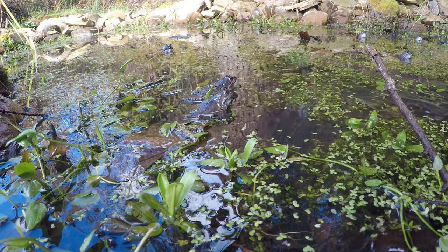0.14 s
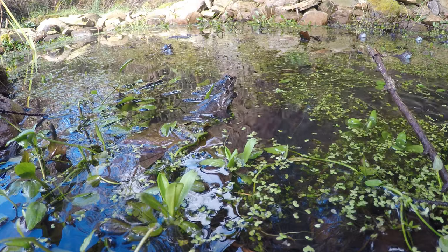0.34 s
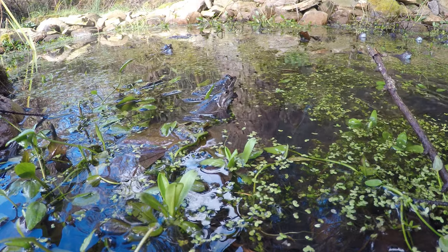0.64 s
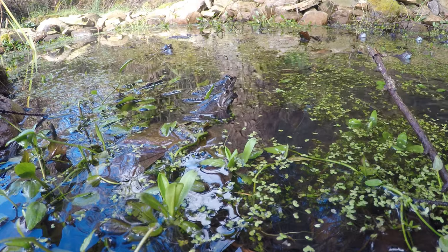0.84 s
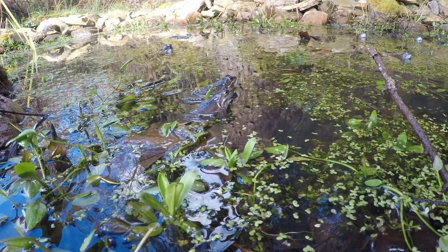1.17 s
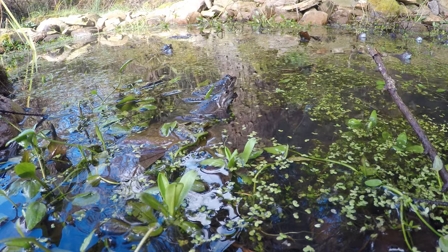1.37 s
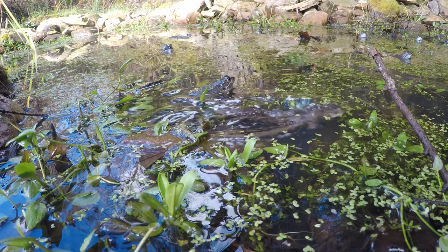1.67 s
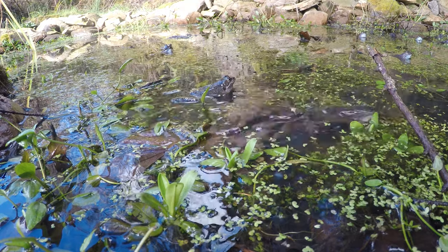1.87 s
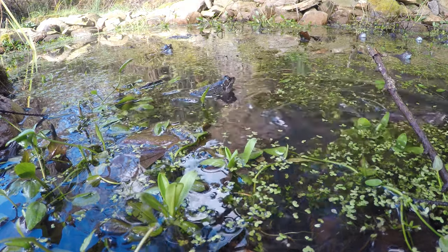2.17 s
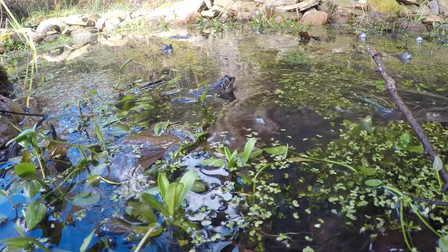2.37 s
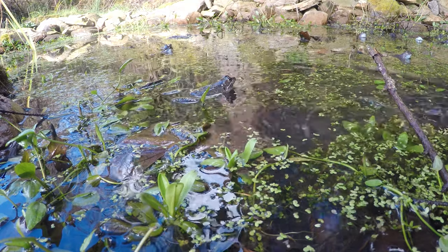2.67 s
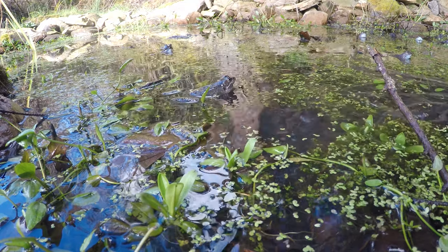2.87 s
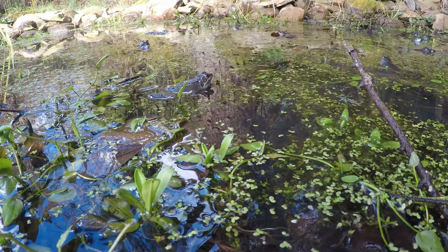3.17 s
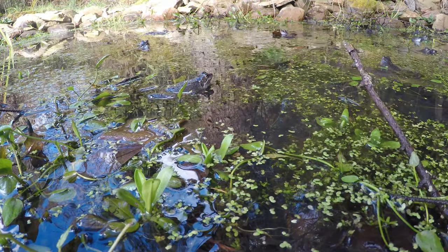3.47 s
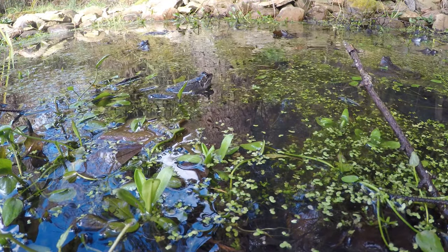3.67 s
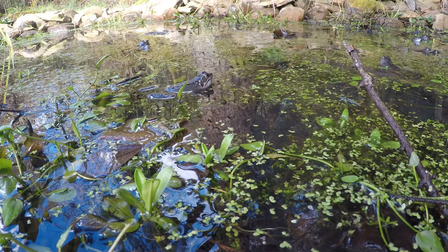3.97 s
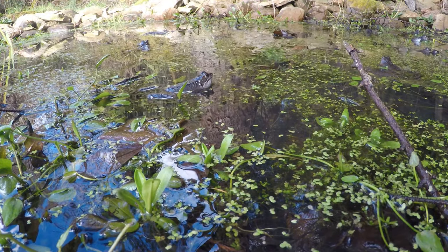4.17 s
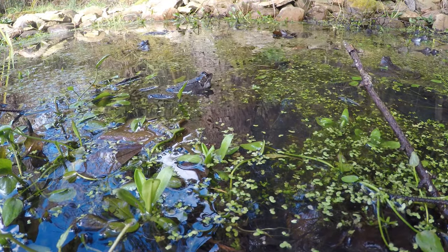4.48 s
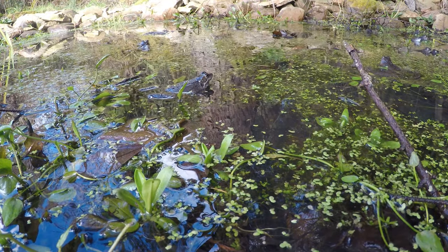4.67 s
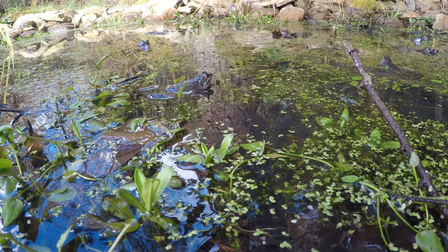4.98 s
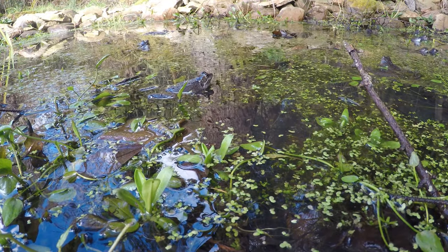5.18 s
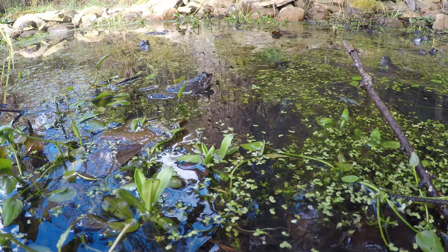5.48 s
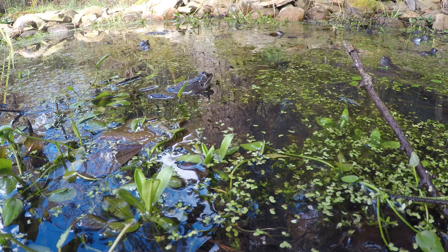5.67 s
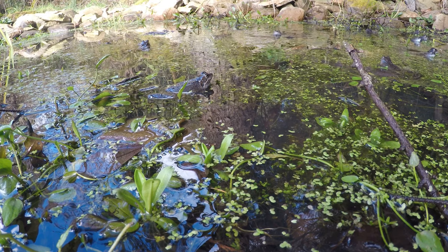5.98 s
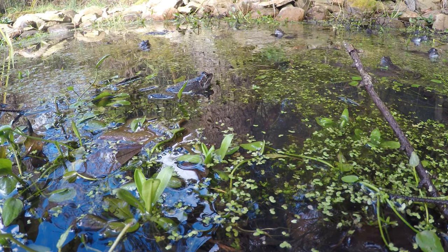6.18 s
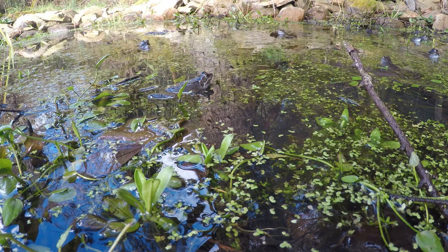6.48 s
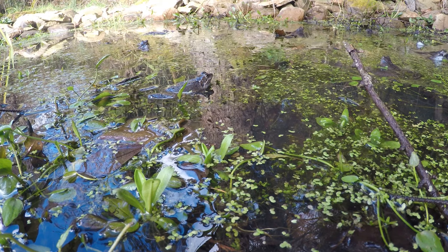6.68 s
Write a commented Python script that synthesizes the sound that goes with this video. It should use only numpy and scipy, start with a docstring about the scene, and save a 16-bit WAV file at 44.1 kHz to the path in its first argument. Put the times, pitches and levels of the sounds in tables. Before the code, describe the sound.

Overlapping soft frog croaks, a faint watery gurgle, then sparse croaking and bright bird chirps over a very quiet outdoor hush.

```python
"""Under a soft outdoor hush (shaped noise) frogs purr in a garden pond from the start.
Each croak is a swelling train of knocks, impulses that excite resonances of the throat and its air sacs.
A small bird sings thin notes, near sines of gliding pitch; others answer from farther off, mostly as echo.
Now and then the water plips, a noise splash and a ringing bubble, and once it gurgles with low bubbles.
The garden adds a short echo, noise taps that decay at a different rate in each band."""
import sys
import numpy as np
from scipy import signal
from scipy.fft import rfft, irfft
from scipy.io import wavfile
from scipy.ndimage import uniform_filter1d

SR = 44100
rng = np.random.default_rng(int(sys.argv[2]) if len(sys.argv) > 2 else 0)


def store_wav(level_fs):
    """Save 16-bit WAV to argv[1]."""
    pcm = np.round(np.clip(np.atleast_2d(level_fs), -1, 1) * 32767)
    wavfile.write(sys.argv[1], SR, pcm.T.astype(np.int16))


N = 301203  # samples


def gain_of(db):
    """Logarithmic level: decibels to an amplitude factor."""
    return 10 ** (np.asarray(db) / 20)


def evened(x):
    """Power normalization: scales to rms 1."""
    return x / np.sqrt(np.mean(x ** 2) + 1e-20)


def read(points, hz, column=1):
    """Interpolation on a logarithmic frequency axis: one column of a table whose first column is Hz."""
    points = np.array(points)
    return np.interp(np.log(hz + 1), np.log(points[:, 0]), points[:, column])


def add(mix, s, sound):
    """Superposition: mixes a sound in at time s, trimmed to the scene."""
    at = round(s * SR)
    sound = sound[max(-at, 0):]
    part = mix[max(at, 0):][:len(sound)]
    part += sound[:len(part)]


def place(x, right_db):
    """Interaural level difference: a source to the right reaches the left microphone weaker."""
    return x * gain_of([[-right_db / 2], [right_db / 2]])


# Spectrum of the outdoor hush. Each row: frequency in Hz, relative density in dB per Hz.
HUSH_SPECTRUM = [(28, -13), (48, -15.5), (126, -38), (152, 6), (220, 4.5), (330, 1), (600, -6.5),
                 (1500, -12.5), (3500, -17), (5000, -18.5), (10000, -19), (12000, -27), (15000, -29)]


def hush(level_db=-55, patchy_db=1.5):
    """Diffuse field: air and leaves as noise, unrelated at the two microphones, drifting in soft patches."""
    frames = N // 512 + 5
    hz = np.fft.rfftfreq(2048, 1 / SR)
    a, b, c, d, patches = rng.standard_normal((frames, len(hz), 5)).T
    # smoothed first over frequency, then over time
    patches = uniform_filter1d(patches, size=20, axis=0)
    patches = evened(uniform_filter1d(patches, size=10, axis=1))
    spectrum_db = read(HUSH_SPECTRUM, hz)[:, None] + patchy_db * patches
    z = np.array([a + 1j * b, c + 1j * d]) * gain_of(spectrum_db)
    noise = signal.istft(z, nperseg=2048, noverlap=1536)[1][:, :N]
    return gain_of(level_db) * evened(noise)


def peak(hz, centre_hz, half_width_hz):
    """Resonance curve: gain falls with the squared distance from the centre, so the skirts are steep."""
    return 1 / (1 + ((hz - centre_hz) / half_width_hz) ** 2)


def through(values, u):
    """Polynomial interpolation: a smooth curve through evenly spaced values, for u from 0 to 1."""
    places = np.linspace(0, 1, len(values))
    return np.polyval(np.polyfit(places, values, len(values) - 1), u)


def ringing(gain, swell):
    """Minimum phase, from the cepstrum, makes a ring start abruptly; weakening it by swell adds a build-up."""
    cepstrum = irfft(np.log(gain + 1e-6))
    half = len(cepstrum) // 2
    fold = np.r_[1, np.full(half - 1, 2), 1, np.zeros(half - 1)]
    minimum_phase = rfft(cepstrum * fold).imag
    ring = irfft(gain * np.exp(1j * (1 - swell) * minimum_phase))
    return np.roll(ring, half)  # time zero lies in the middle of the array


SWELL = 0.31  # share of a knock that builds up, at the usual ring time
RASP_WIDTH_HZ = 129  # half width of the upper modes
THROAT_TOP_HZ = 792  # before tuning; above it sacs and throat fall silent: a hollow under the upper modes

# Resonances of the throat.
# Each row: frequency in Hz before tuning, half width in Hz, level in dB before the croak's throat level.
THROAT_MODES = [(595, 32, -41), (690, 42, -41)]


def knock(sac_hz, ring, throat_db, throat_shift, upper, sac_width=260, bass_reach=2.3, usual_ring=0.031):
    """Modal excitation: a knock rings the air sacs, the throat and any upper modes; short ones swell as they die."""
    hz = np.fft.rfftfreq(8192, 1 / SR) + 1

    # a small soft body radiates neither deep bass nor treble; a short ring reaches farther down
    bass_limit_hz = sac_hz - bass_reach / ring
    body = 1 / np.sqrt((1 + (bass_limit_hz / hz) ** 10) * (1 + (hz / 1950) ** 30))

    # the longer the sac rings, the narrower and taller its resonance
    ring_width_hz = np.log(1000) / (2 * np.pi * ring)
    sac = ring * np.sqrt(peak(hz, sac_hz, ring_width_hz)) * peak(hz, sac_hz, sac_width)

    throat = sum(gain_of(throat_db + db) * peak(hz, f * throat_shift, width)
                 for f, width, db in THROAT_MODES)
    hollow = 1 / (1 + (hz / (THROAT_TOP_HZ * throat_shift)) ** 20)
    rasp = ring * sum(gain_of(db) * np.exp(-.5 * ((hz - f) / RASP_WIDTH_HZ) ** 2) for f, db in upper)

    spectrum = body * np.sqrt(hollow * (sac ** 2 + throat ** 2) + rasp ** 2)
    return SR * ringing(spectrum, min(SWELL * usual_ring / ring, 1))


KNOCK_OFFSET_S = 0.001135  # constant time offset of every knock against its listed start
RISE_CURVE, FALL_CURVE = 1.7, 3.2  # effort rounds off toward its top (exponents)
SAC_CURVE, THROAT_CURVE = 2.2, 2.1  # sacs retune and throat opens mostly late in a croak (exponents)
RING_PER_PITCH = 1.5  # a tighter, higher sac rings shorter (exponent)
RASP_PER_EFFORT = 0.52  # harder knocks rasp more (dB per dB)


def croak(start, count, gaps_ms, effort, sac, ring, throat, upper, lag_ms, scatter=0.033, uneven_db=0.86):
    """Pulse train: one squeeze of air sets knocks that change pace, swell and fade as sacs and throat retune."""
    count = round(count)
    top_db, top_at, rise_db, fall_db = effort
    throat_db, growth_db, tuning = throat
    u = np.linspace(0, 1, count)
    top_at = np.clip(top_at, .05, .95)

    gaps = through(gaps_ms, np.linspace(0, 1, count - 1))
    times = start + np.r_[0, np.cumsum(gaps)] / 1000

    before_top = np.maximum(1 - u / top_at, 0)
    after_top = np.maximum((u - top_at) / (1 - top_at), 0)
    push_db = top_db - rise_db * before_top ** RISE_CURVE - fall_db * after_top ** FALL_CURVE
    forced_db = RASP_PER_EFFORT * (push_db - push_db.mean())

    sac_hz = sac[0] + (sac[1] - sac[0]) * u ** SAC_CURVE
    rings = ring * (sac_hz.mean() / sac_hz) ** RING_PER_PITCH
    throats = throat_db - growth_db * (1 - u ** THROAT_CURVE)

    out, lag = np.zeros((2, N)), lag_ms / 1000
    for k, (throat_luck, mode_luck, level_luck) in enumerate(rng.standard_normal((count, 3))):
        modes = [(hz * (1 + scatter * mode_luck), first + (last - first) * u[k] + forced_db[k])
                 for hz, first, last in upper]
        sound = knock(sac_hz[k], rings[k], throats[k], tuning * (1 + scatter * throat_luck), modes)
        sound = gain_of(push_db[k] + uneven_db * level_luck) * sound
        s = times[k] + KNOCK_OFFSET_S - len(sound) / 2 / SR
        for ear, delay in zip(out, (lag / 2, -lag / 2)):
            add(ear, s + delay, sound)
    return out


def widened(x, amount=1.6, above_hz=830):
    """Stereo widening: above the cut-off the chorus gets a quadrature side signal; the low body stays in place."""
    hz = np.fft.rfftfreq(N, 1 / SR) + 1
    upper = 1 / (1 + (above_hz / hz) ** 10)
    side = irfft(rfft(x.mean(0)) * 1j * amount * upper, N)
    return x + np.array([-side, side])


# Croaks, each a run of knocks of a frog's larynx. Each row: start in seconds, number of knocks,
# gaps between knocks in ms (at even steps through the croak),
# effort (top in dB before the chorus level, place of the top as a share of the croak before clipping,
# rise in dB, fall in dB), air sac pitch in Hz (first, last), sac ring time in seconds to -60 dB at mean pitch,
# throat (level at the end in dB, growth in dB, tuning ratio),
# upper modes heard in forced croaks [(Hz, first dB, last dB against the sac), before scatter and effort],
# delay of the left microphone after the right in ms.
CROAK_RUNS = [ (0.006, 12, (46.4, 48.7, 44.6), (-14, 0.52, 5, 1.2), (440, 455), 0.04, (4, 4, .96),
              [(1140, -27, -26), (1750, -38, -22)], 0.22), (0.035, 15, (50, 38.5, 36, 36.5, 39),
              (-22, .7, 5, 3), (510, 480), 0.024, (-5, 0, 1), [], 0.22), (1.096, 4, (67.3, 65, 59),
              (-20.5, 0.5, 11.5, .5), (470, 410), 0.026, (6.8, 17, .98), [], 0.1),
              (1.4312, 5, (36.5, 35, 38.8), (0.6, 0.65, 14.5, .3), (480, 540), .015, (-6, 8, 1),
              [(1060, -25, -21), (1690, -25, -25)], -0.12), (1.617, 3, (36.4, 36, 34.3),
              (-7.5, .1, -1, 4.5), (520, 484), 0.018, (0, 15, 1.02), [(1040, -17, -21), (1640, -31, -40)],
              -0.02), (1.721, 7, (33, 28, 24.3), (-8.5, 4, 5, -1), (438, 430), 0.046, (-1, 4, .98),
              [(930, -38, -30), (1300, -54, -36)], 0.05), (1.9142, 5, (25.3, 28, 34.5, 32.3),
              (-7, .05, 0, 7), (470, 505), .016, (-8, -3, 1), [(950, -21, -31), (1400, -27, -47)], 0.08),
              (2.077, 7, (37, 37.9, 34), (-16, -0.6, 3.5, 1), (467, 462), 0.022, (-18, 2, 1), [], 0.16),
              (2.3112, 10, (58, 44, 37), (-24, .5, 5, 0), (424, 450), 0.032, (-3, 16, 1), [], 0.16),
              (2.3407, 5, (39.5, 37.7, 37.2), (-16.5, 8, 2, 1), (520, 527), .023, (-23, 4, .92), [], 0.18),
              (2.585, 3, (38, 40, 39), (-20, -4, 3, 5), (522, 500), 0.028, (-14, 2, .88), [(950, -21, -19)],
              0.18), (2.7625, 5, (48, 44, 40), (-20.5, -2, 3, 8), (458, 440), 0.027, (1, 4, 1.12),
              [(900, -24, -10)], 0.1), (3.0023, 12, (43, 45.4, 38.5), (-22, .9, 4, 0), (400, 400),
              0.024, (-5, 3, .86), [], 0.03), (3.886, 10, (66.2, 52.4, 39), (-8.3, 3, 8, 4), (380, 406),
              0.03, (5, 28, 1.08), [(1270, -42, -39), (1620, -44, -46)], 0.0),
              (5.7496, 10, (52.2, 51, 29.6), (-15, .88, 17, 4), (380, 404), 0.038, (-8, 11, 1.05), [],
              -0.03)]


def frogs(level_db=-31.0, echo_db=-6, echo_per_db=0.21, right_db=2.2, right_db_per_ms=4):
    """Direct-to-reverberant ratio: the nearer and louder the frog, the drier; returns direct and echo feed."""
    direct, scattered = np.zeros((2, N)), np.zeros(N)
    for row in CROAK_RUNS:
        top_db, lag_ms = row[3][0], row[-1]
        sound = gain_of(level_db) * croak(*row)
        direct += place(sound, right_db + right_db_per_ms * lag_ms)
        scattered += gain_of(echo_db - echo_per_db * top_db) * sound.mean(0)
    return widened(direct), scattered


def whistle(length, pitch_hz, contour, waver=0.0085, flutter_db=0.85, overtone_db=-42, glide_loss_db=26):
    """Frequency modulation: a near sine glides along a contour, weaker where it lies below the note's pitch."""
    u = np.linspace(0, 1, max(int(length * SR), 64))
    ratio = np.interp(u, np.linspace(0, 1, len(contour)), contour)
    ratio = uniform_filter1d(ratio, size=len(u) // len(contour), mode="nearest")
    shake, flutter = (evened(uniform_filter1d(row, size=70))[:len(u)]
                      for row in rng.standard_normal((2, SR)))

    phase = 2 * np.pi * np.cumsum(pitch_hz * ratio * (1 + waver * shake)) / SR
    tone = np.sin(phase) + gain_of(overtone_db) * np.sin(2 * phase)
    level = gain_of(flutter_db * flutter - glide_loss_db * np.maximum(1 - ratio, 0))
    envelope = np.maximum(1 - (2 * u - 1) ** 2, 0) ** 0.49
    return tone * level * envelope


# Pitch contours, by kind of bird note. Each entry: ratios to the note's pitch at even steps through the note.
PITCH_CONTOURS = {"slur": (.66, .71, 0.99, 1.02, 1.01, .99, 0.8),
                  "dip": (1.24, 1.09, 1.025, 1, 1, 1.01, 1.08, 1.22),
                  "step": (.8, .94, .99, 1, 1.005, 1.01), "hold": (.97, 1.005, 1, .99),
                  "rise": (.8, 1.01, 1.17), "fall": (1.17, .99, .86), "sag": (1.2, 0.98, 0.98)}


def far_birds(level_db=-69, low_hz=2900, high_hz=3800, length=0.081, count=26, until_s=4.3):
    """Reverberant field: faint twitter of distant birds at random times, heard only as echo."""
    out = np.zeros(N)
    for when, pitch in rng.random((count, 2)):
        note = whistle(length, low_hz + (high_hz - low_hz) * pitch, PITCH_CONTOURS["sag"])
        add(out, when * until_s, gain_of(level_db) * note)
    return out


# Bird notes. Each row: start in seconds, kind of contour, length in seconds, pitch in Hz,
# level in dB before the split into direct sound and echo.
BIRD_NOTES = [(0.458, "hold", 0.042, 4420, -45.5), (1.533, "fall", 0.023, 2950, -60.5),
              (1.603, "rise", 0.045, 8020, -63), (1.606, "slur", 0.048, 4400, -59.5),
              (1.665, "step", 0.085, 6430, -49), (1.792, "dip", 0.11, 6520, -46),
              (1.823, "fall", .03, 2750, -56.5), (2.012, "fall", 0.037, 3050, -57.5),
              (2.64, "sag", .11, 6900, -64), (3.073, "fall", 0.031, 2770, -51.5),
              (3.29, "hold", 0.13, 5450, -74), (3.949, "sag", 0.39, 7200, -70),
              (4.164, "slur", 0.067, 4300, -54.5), (4.367, "sag", 0.1, 5500, -60),
              (4.55, "sag", .1, 5480, -64.5), (4.615, "step", .07, 3850, -66.5),
              (4.891, "rise", 0.047, 7660, -50.5), (4.912, "rise", 0.099, 4730, -50),
              (4.99, "step", 0.038, 6380, -38.5), (5.087, "dip", 0.093, 6280, -31.5),
              (5.188, "fall", 0.016, 6580, -42), (5.26, "sag", 0.072, 5530, -65),
              (5.435, "sag", 0.088, 5430, -66.5), (6.257, "slur", 0.082, 4644, -41),
              (6.306, "step", 0.041, 5590, -46.5), (6.352, "step", .045, 6500, -45.5),
              (6.443, "dip", 0.12, 6340, -37), (6.551, "rise", 0.018, 5690, -33.5),
              (6.571, "slur", 0.055, 4468, -26), (6.7936, "rise", 0.0075, 6200, -32.5),
              (6.8, "fall", .01, 7000, -35)]


def birds(far_db=-52, spread_db=6, near_waver=0.0045, far_waver=0.0173):
    """Distance cues: faint notes come from afar, blurred and mostly as echo; returns direct and echo feed."""
    direct, scattered = np.zeros((2, N))
    for s, kind, length, hz, db in BIRD_NOTES:
        near = 1 / (1.5 + np.exp((far_db - db) / spread_db))  # from 0 to 2/3
        waver = near_waver + (1 - near) * far_waver
        note = gain_of(db) * whistle(length, hz, PITCH_CONTOURS[kind], waver=waver)
        add(direct, s, note * (0.61 + 0.27 * near))
        add(scattered, s, note * (1.6 - near))
    return direct, scattered


def mode(hz, ring, rise):
    """Damped oscillation: swells for a moment and dies by 60 dB in the ring time; cut at 0.1 s."""
    t = np.arange(SR // 10) / SR
    swell = 1 - np.exp(-(t / rise) ** 2)
    return -np.sin(2 * np.pi * hz * t) * swell * np.exp(-np.log(1000) * t / ring)


# Small plips of water. Each row: start in seconds, bubble level in dB, bubble pitch in Hz,
# ring time in seconds to -60 dB, splash level in dB. Levels are before placing.
WATER_PLIPS = [(2.265, -42, 1750, 0.014, -54), (2.669, -44, 1279, 0.017, -48),
               (2.688, -44.5, 1420, 0.033, -65)]


def plips():
    """Bubble resonance: a tiny splash of noise, and a bubble that rings."""
    out = np.zeros(N)
    for s, db, hz, ring, splash_db in WATER_PLIPS:
        bubble = gain_of(db) * mode(hz, ring, rise=0.0004)
        spray = signal.lfilter(*signal.butter(1, 5000, fs=SR), rng.standard_normal(len(bubble)))
        fade = np.exp(-np.arange(len(bubble)) / SR / 0.0028)
        add(out, s, bubble + gain_of(splash_db) * evened(spray) * fade)
    return out


# Water stirred by a swimming frog. The row: start in seconds, end in seconds (of the bubbles' onsets).
SWIM_SPAN = (3.1, 3.6)


def swirl(level_db=-47, low_hz=200, high_hz=460, ring=0.32, count=44):
    """Superposed bubble resonances: stirred water gurgles softly, strongest in the middle of the swim."""
    out = np.zeros(N)
    first_s, last_s = SWIM_SPAN
    for when, pitch, softness in rng.random((count, 3)):
        bubble = mode(low_hz * (high_hz / low_hz) ** pitch, ring, rise=ring / 10)
        level = gain_of(level_db - 10 * softness) * np.sin(np.pi * when) ** .5
        add(out, first_s + when * (last_s - first_s), level * bubble)
    return out


# Echo of the garden. Each row: frequency in Hz, level in dB, decay time in seconds to -60 dB.
GARDEN_ECHO = [(398, -5.5, 0.18), (3660, 2, 0.3), (7940, 2.5, 0.25)]


def garden(x, gap=0.0017):
    """Multiple scattering: stones, banks and leaves return many small echoes, each band dying at its own speed."""
    taps = rng.standard_normal((2, SR)) * (rng.random((2, SR)) < 1 / 10)
    taps = taps * (np.arange(SR) > gap * SR)  # no echo before the gap in seconds
    hz, t, z = signal.stft(evened(taps), SR, nperseg=256)
    decay = np.log(1000) / read(GARDEN_ECHO, hz, column=2)[:, None]
    shape = gain_of(read(GARDEN_ECHO, hz))[:, None] * np.sqrt(2 * decay / SR) * np.exp(-decay * t)
    response = signal.istft(z * shape, SR, nperseg=256)[1]
    return signal.fftconvolve(x[None], response, axes=1)[:, :N]


def scene(water_echo_db=1.0, right_db=3.5):
    """Superposition in one sound field: frogs, water and bird a little to the right, all in the same garden."""
    background = hush()
    chorus, chorus_echo = frogs()
    twitter = far_birds()
    song, song_echo = birds()
    water = plips() + swirl()
    echo = garden(chorus_echo + gain_of(water_echo_db) * water + song_echo + twitter)
    return chorus + place(water + song, right_db) + echo + background


def record(dry, edge_hz=15100):
    """Linear-phase low-pass filtering: the recorder's band limit."""
    low_pass = signal.firwin(511, edge_hz, window=("kaiser", 9), fs=SR)
    return signal.oaconvolve(dry, low_pass[None], "same")


dry = scene()
out = record(dry)
store_wav(out)
```